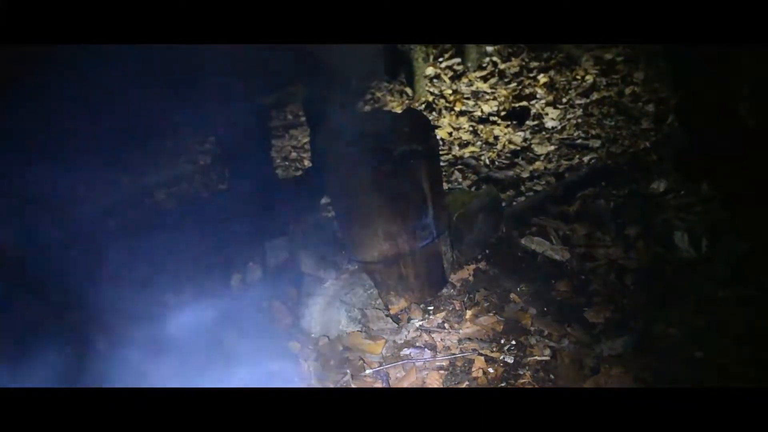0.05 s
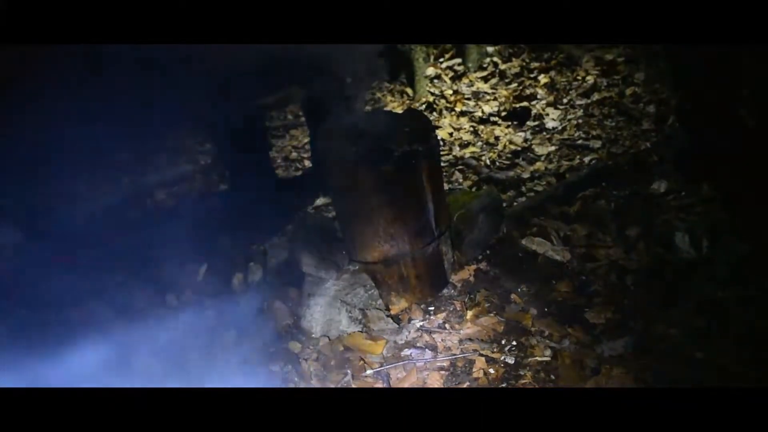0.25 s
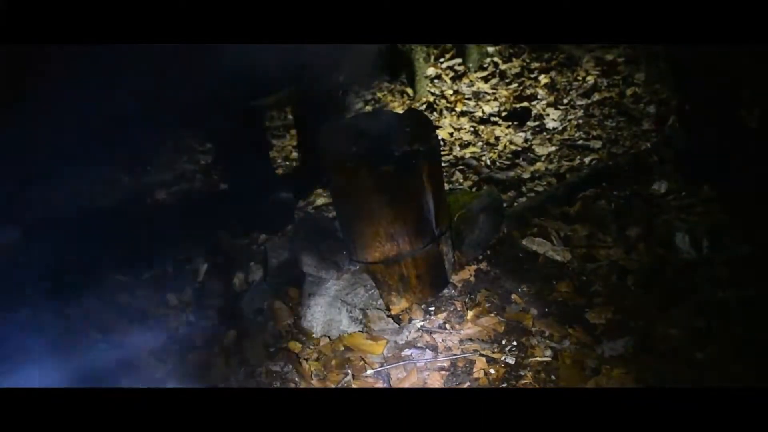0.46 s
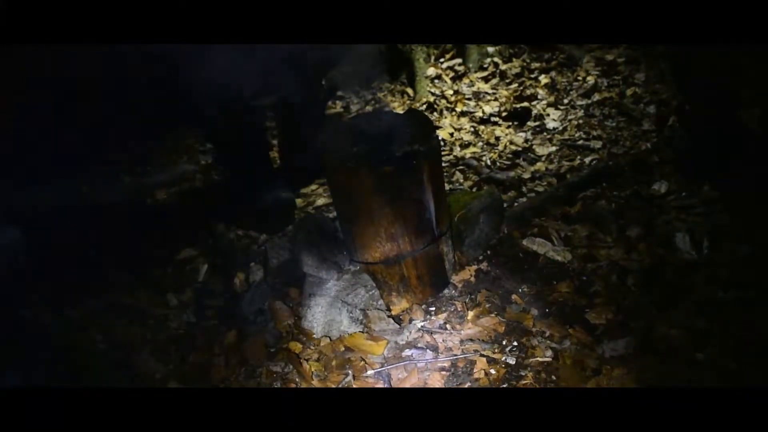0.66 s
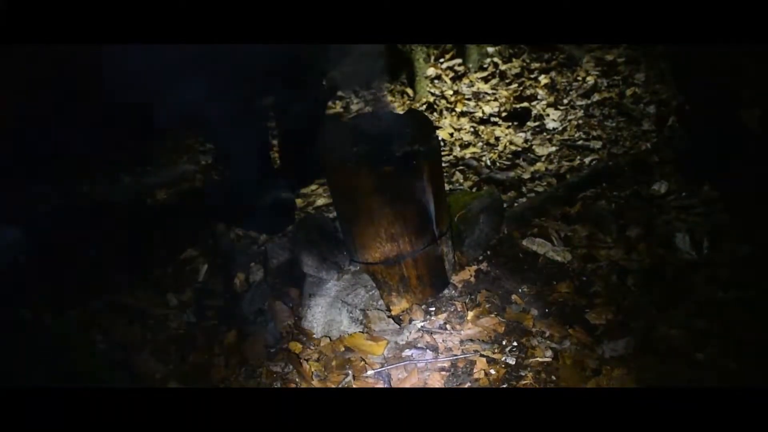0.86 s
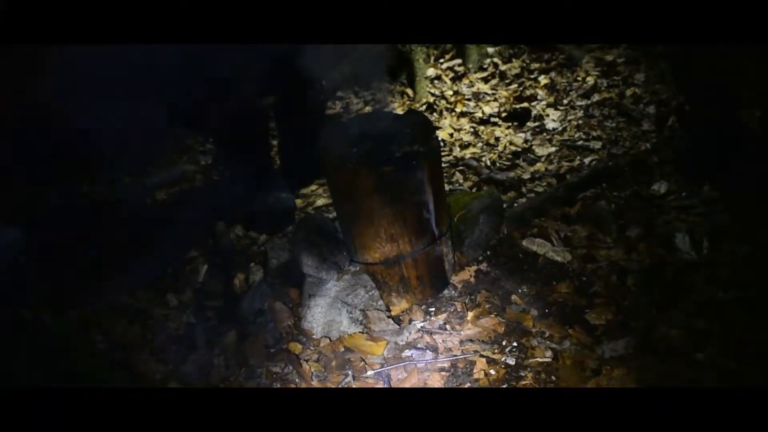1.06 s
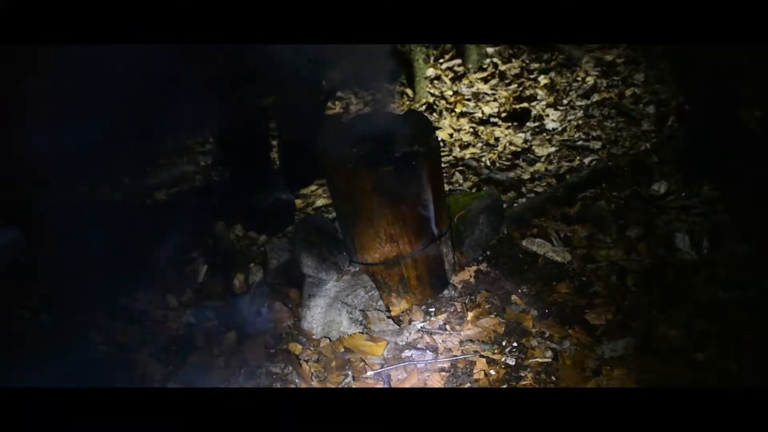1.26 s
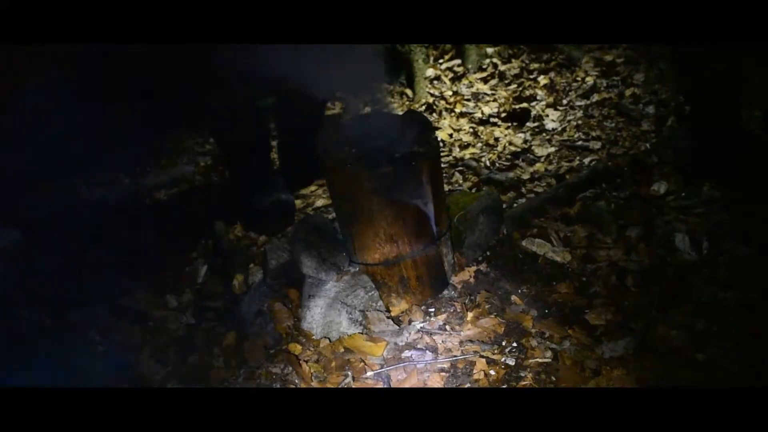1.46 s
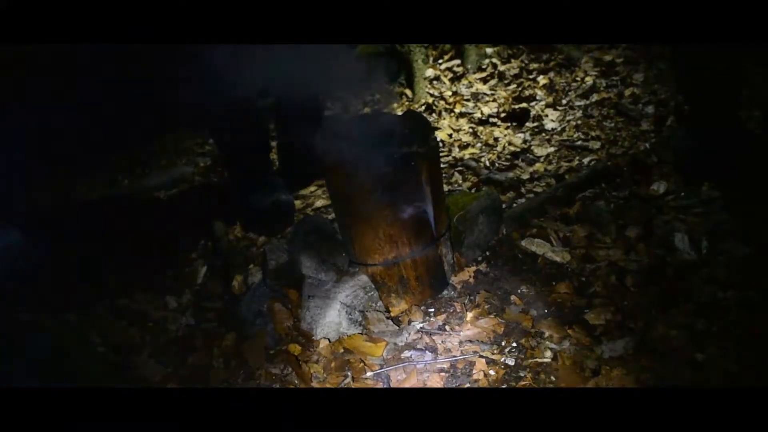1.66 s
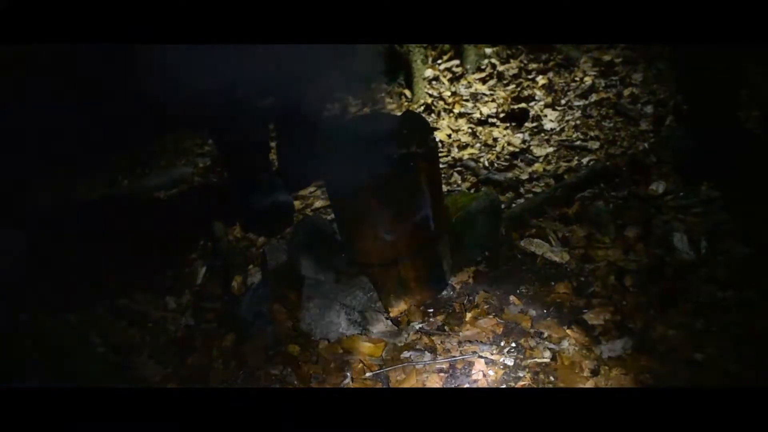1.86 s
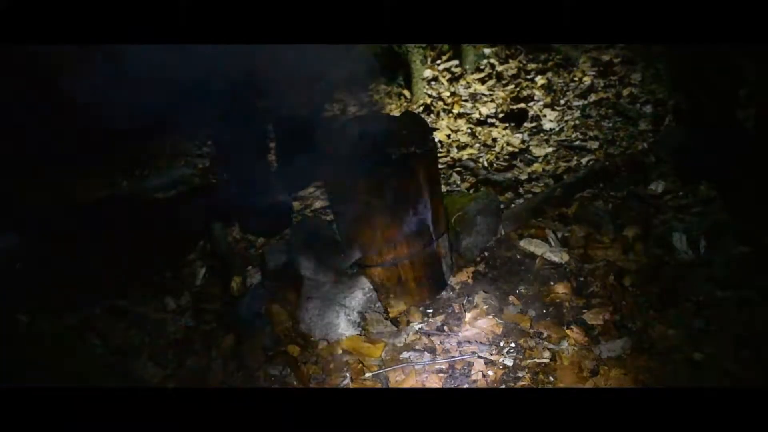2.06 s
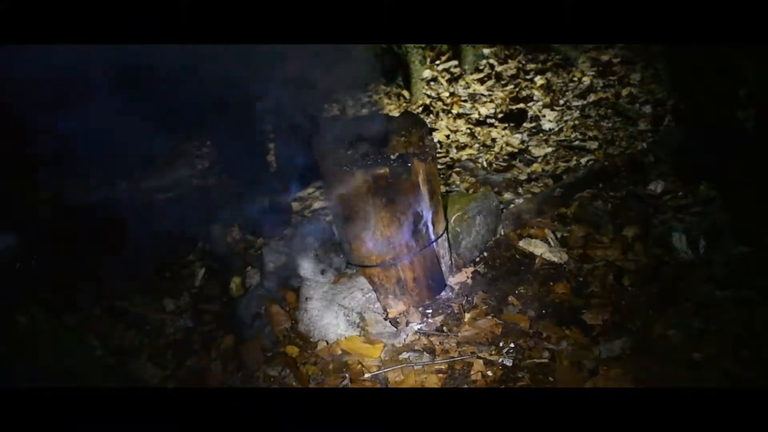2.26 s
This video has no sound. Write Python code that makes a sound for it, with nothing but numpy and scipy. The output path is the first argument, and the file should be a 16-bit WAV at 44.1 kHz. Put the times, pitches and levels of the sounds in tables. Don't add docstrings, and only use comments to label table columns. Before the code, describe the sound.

A damp log crackles on embers outdoors at night: one loud pop with spitting early, a quiet simmering stretch, then a cluster of crackles and another sharp pop near the end, heard close in stereo.

```python
import sys
import numpy as np
from scipy import signal
from scipy.io import wavfile
from scipy.ndimage import uniform_filter1d

SR = 44100
rng = np.random.default_rng(int(sys.argv[2]) if len(sys.argv) > 2 else 0)


def natural_amplitude(level_db):
    exponent = np.asarray(level_db, float) / 20
    return 10 ** exponent


def inscribe(sig):
    pcm = np.round(np.clip(np.atleast_2d(sig).T, -1, 1) * 32767)
    wavfile.write(sys.argv[1], SR, pcm.astype(np.int16))


N = 101430


def at_hz(points, hz):
    table_hz, value = np.transpose(points)
    return np.interp(np.log(hz), np.log(table_hz), value)


def drift(rate_hz):
    r = np.exp(-80 * np.pi * rate_hz / SR)
    chance = rng.standard_normal(N // 40 + 2002)
    slow = signal.lfilter([1], [1, -2 * r, r * r], chance)[2000:]
    return np.interp(np.arange(N) / 40, np.arange(len(slow)), slow / slow.std())


def grains(rough_db):
    sign = rng.choice([-1, 1], (2, 2, N))
    size_db = rough_db * np.minimum(rng.exponential(1, (2, 2, N)), 5)
    g = sign * natural_amplitude(size_db)
    return g / g.std()


def burst(t_s, level_db, rise_ms, fall_ms):
    ms = (np.arange(N) / SR - t_s) * 1000
    rise = np.exp(np.clip(-ms / rise_ms, -50, 50))
    fall = np.exp(np.clip(ms / fall_ms, -50, 50))
    return 2 * natural_amplitude(level_db) / (rise + fall)


def bandpass(order, edges_hz):
    return signal.butter(order, edges_hz, "band", fs=SR, output="sos")


def to_stereo(mid, side, alike):
    alike = np.clip(alike, 0, 1)
    return np.sqrt(1 + alike) * mid + np.sqrt(1 - alike) * side * [[1], [-1]]


def colour(source, spectrum, likeness, patchy_db, lumps_db=0):
    out, power = 0, 0
    edges_hz = 20 * 2 ** np.arange(0, 9.9, 1 / 3)
    for k, (low, high) in enumerate(zip(edges_hz, edges_hz[1:])):
        hz = np.sqrt(low * high)
        level_db = at_hz(spectrum, hz)
        if level_db > -45:
            mid, side = signal.sosfilt(bandpass(2, [low, high]), source[k % 2] + 1e-18)
            swing_db = patchy_db * drift(11.2) + lumps_db * (hz < 400)
            out = out + natural_amplitude(level_db + swing_db) * to_stereo(mid, side, at_hz(likeness, hz))
            power += natural_amplitude(2 * level_db) * (high - low) * 2 / SR
    return out / np.sqrt(power)


# t/s, steam level/dB, simmer level/dB
LEAK_COURSE = [(0, -57.5, -55), (.14, -53.5, -51.5), (.23, -52.5, -55), (.30, -49, -49.5),
               (.40, -50.5, -52), (.47, -50, -50.5), (.53, -57.5, -54), (.60, -65, -53.5), (.64, -62, -59),
               (1.15, -62.5, -59.5), (1.3, -56.5, -57), (1.55, -57, -56), (1.8, -65, -53), (1.88, -57, -57),
               (2.05, -53, -55), (2.13, -58, -58.5), (2.3, -58, -58.5)]
# f/Hz, density/(dB per Hz)
STEAM_SPECTRUM = [(2350, -32), (4000, -11), (5250, 3), (6510, 3.5), (7570, 2), (9720, 10), (12500, 1.5),
                  (16000, -24)]
# f/Hz, density/(dB per Hz)
SIMMER_SPECTRUM = [(250, -20), (500, -2.5), (1200, 1), (2200, -2), (3500, -3), (6000, -8)]
# f/Hz, left-right likeness [0..1]
LOG_LIKENESS = [(60, 1), (400, 0.88), (1300, 0.9), (2400, 0.91), (4400, 0.55), (12000, 0.54)]


def steam_and_simmer():
    t_s = np.arange(N) / SR
    leak_s, steam_db, simmer_db = np.transpose(LEAK_COURSE)
    steam = colour(grains(rough_db=0.5), STEAM_SPECTRUM, LOG_LIKENESS, patchy_db=-1.97)
    simmer = colour(grains(rough_db=5.5), SIMMER_SPECTRUM, LOG_LIKENESS, patchy_db=2.0)
    steam = steam * natural_amplitude(np.interp(t_s, leak_s, steam_db))
    simmer = simmer * natural_amplitude(np.interp(t_s, leak_s, simmer_db))
    return steam + simmer


# f/Hz, density/(dB per Hz)
EMBER_SPECTRUM = [(15, -33), (25, -3.5), (141, 2.5), (301, -4), (344, -4), (394, -4.5), (3160, -33.5),
                  (9840, -22.5), (16000, -45.5)]
# f/Hz, left-right likeness [0..1]
WIDE_LIKENESS = [(60, 1), (200, 0.96), (500, 0.59), (1300, 0.23), (4400, 0.19), (12000, 0.29)]


def embers():
    air = rng.standard_normal((2, 2, N))
    lumps_db = 1.3 * drift(10)
    breath = colour(air, EMBER_SPECTRUM, WIDE_LIKENESS, patchy_db=.4, lumps_db=lumps_db)
    return natural_amplitude(-64.5) * breath


JET_LIKENESS = .8
# t/s, peak level/dB, hold/ms, fall/ms
POCKET_BURSTS = [(.2422, -3, 1.1, .3), (.2492, -22, .4, .4), (.257, -33, .3, .5), (.265, -26, .1, .4),
                 (.2717, -21, .1, .4), (.2752, -27, .3, .5), (.2784, -29, .2, .2), (.2805, -30, .2, .5),
                 (.2887, -28, .05, .15), (.3365, -35, .05, .2), (.4795, -27, .05, .15),
                 (.5003, -30, .7, .2), (1.222, -38, .05, .25), (1.5699, -29, .4, .2), (1.5717, -27, .4, .3),
                 (1.5772, -25, .3, .6), (1.5806, -22, .05, .2), (1.5878, -14, .05, .15),
                 (1.5897, -25, .1, .7), (1.6045, -29, .4, .7), (1.6104, -29, .1, .6), (1.6392, -31, .1, .5),
                 (1.703, -32, .1, .7), (1.7327, -40, .05, .3), (1.9512, -28, .1, .7), (1.9665, -3, .9, .4),
                 (1.9759, -16, .1, .4), (1.9808, -20, .1, .8), (1.9881, -20, .05, .3), (1.993, -32, .4, .4)]


def pops():
    out, ms = np.zeros((2, N)), np.arange(400) / SR * 1000
    rise_ms, skirt_db = .05, -2
    core, skirt = bandpass(2, (7800, 12500)), bandpass(2, (6000, 16800))
    for t_s, peak_db, hold_ms, fall_ms in POCKET_BURSTS:
        pressure = np.minimum(ms / rise_ms, 1) * np.exp(-np.maximum(ms - hold_ms, 0) / fall_ms)
        blow = pressure * rng.choice([-1, 1], (2, ms.size))
        jet = signal.sosfilt(core, blow) + natural_amplitude(skirt_db) * signal.sosfilt(skirt, blow)
        mid_power = uniform_filter1d(jet[0] ** 2, size=13)
        top = np.sqrt(mid_power.max() * (1 + JET_LIKENESS))
        start = int(t_s * SR)
        out[:, start:start + ms.size] += natural_amplitude(peak_db) / top * jet
    return to_stereo(*out, JET_LIKENESS)


# t/s, peak level/dB, f/Hz, t60/s
KNOCK_EVENTS = [
    (.2432, -9.5, 900, .001),
    (1.9511, -19, 1300, .0015),
    (1.363, -41, 1750, .025),
    (1.388, -52, 155, .09),
    (1.545, -48, 620, .03),
    (1.625, -38, 420, .04),
    (1.5695, -42, 640, .03),
]


def knocks():
    out, right_db = np.zeros(N), 5
    for t_s, peak_db, hz, t60_s in KNOCK_EVENTS:
        t = np.maximum(np.arange(N) / SR - t_s, 0)
        out -= natural_amplitude(peak_db - 60 * t / t60_s) * np.sin(2 * np.pi * hz * t)
    return out * natural_amplitude(right_db * np.array([[-.5], [.5]]))


# t/s, level/dB, rise/ms, fall/ms, f/Hz
FIBRE_SPLITS = [(1.6174, -27, .6, .9, 2900), (1.6231, -24, 1.3, 2.2, 2850), (1.853, -36, .6, 2.5, 2100),
                (1.9513, -32, .1, 1.8, 2600), (.2435, -35, .3, 4, 2900), (1.967, -29, .2, 1.8, 2100),
                (1.6476, -35, .6, 3.5, 1900), (1.577, -34, .6, 4.5, 2600), (.272, -48, .5, 4, 2500),
                (1.6, -42, 20, 30, 3500), (.589, -55, 3, 3, 1200), (1.222, -52, .3, 2.2, 1700),
                (1.547, -52, 6, 4, 1100), (1.570, -40, .4, 3, 1200), (1.588, -36, .3, 3, 2200),
                (1.604, -37, 1.5, 3, 2500), (1.626, -38, 6, 8, 1400), (1.672, -48, 2.2, 6, 1900),
                (1.704, -48, .5, 6, 3000), (1.751, -49, 4, 5, 1300), (1.793, -50, 9, 9, 2100),
                (1.828, -47, 6, 5, 2400), (1.844, -40, 7, 3, 1250), (1.862, -44, 2.2, 2.5, 2600)]
# f/Hz, width/Hz, level/dB
LOG_MODES = [
    (1235, 37, -1),
    (1694, 43.5, -9),
    (2026, 77, -5),
    (2790, 50, 2.5),
    (3134, 170, -3.5),
]


def fibres():
    half_width_oct, skirt_oct, skirt_db, body_db = .4, 1.06, -2.5, 2
    out, body = 0, 0
    cracks = grains(rough_db=3)[0]
    for t_s, level_db, rise_ms, fall_ms, hz in FIBRE_SPLITS:
        core = bandpass(2, hz * 2 ** (half_width_oct * np.array([-1, 1])))
        skirt = bandpass(1, hz * 2 ** (skirt_oct * np.array([-1, 1])))
        effort = burst(t_s, level_db, rise_ms, fall_ms)
        run = effort * cracks + 1e-18
        split = signal.sosfilt(core, run) + natural_amplitude(skirt_db) * signal.sosfilt(skirt, run)
        out = out + split * np.linalg.norm(effort) / np.linalg.norm(split, axis=1, keepdims=True)
    for k, (hz, width_hz, level_db) in enumerate(LOG_MODES):
        r = np.exp(-np.pi * width_hz / SR)
        push = (1 - r * r) / 2 * np.array([1, 0, -1])
        ring = [1, -2 * r * np.cos(2 * np.pi * hz / SR), r * r]
        body = body + (-1) ** k * natural_amplitude(level_db) * signal.lfilter(push, ring, out)
    return to_stereo(*(out + natural_amplitude(body_db) * body), .95)


# t/s, level/dB, rise/ms, fall/ms
SPIT_EVENTS = [(.2445, -21, .4, 3.6), (.273, -39, 3.5, 8), (1.6228, -27, 1.0, 2.5), (1.648, -38, .8, 4),
               (1.705, -44, .6, 3), (1.853, -40, .9, 1.8), (1.9685, -24, .4, 4), (1.973, -26, .6, 1.5),
               (.48, -49, 12, 9), (1.58, -36, 4, 18), (1.84, -52, 25, 12), (2.012, -48, 14, 6),
               (2.028, -49, 6, 3), (1.63, -40, 8, 9)]
# f/Hz, density/(dB per Hz)
SPIT_SPECTRUM = [(2500, -30), (4500, -19), (6500, -9), (9200, 0), (11500, -3), (13500, -11), (16000, -17)]


def spits():
    jets = sum(burst(*row) for row in SPIT_EVENTS) * grains(rough_db=3.5)
    likeness = [(1000, JET_LIKENESS), (9000, JET_LIKENESS)]
    return colour(jets, SPIT_SPECTRUM, likeness, patchy_db=3.5)


def scene():
    fire = pops() + spits() + fibres() + knocks() + steam_and_simmer() + embers()
    dip_hz, dip_width_hz, dip_share, right_db = 865, 50, 0.5, 1.2
    dip = signal.lfilter(*signal.iirpeak(dip_hz, dip_hz / dip_width_hz, fs=SR), fire)
    return (fire - dip_share * dip) * natural_amplitude(right_db * np.array([[-.5], [.5]]))


def top_cut(x):
    return signal.sosfilt(signal.butter(12, 16410, fs=SR, output="sos"), x)


def record(dry):
    clip_top = 1.03
    low_pass = signal.cheby2(12, 50, 16400, fs=SR, output="sos")
    cut = signal.sosfilt(low_pass, dry)
    return top_cut(np.clip(cut, -clip_top, clip_top))


dry = scene()
out = record(dry)
inscribe(out)
```